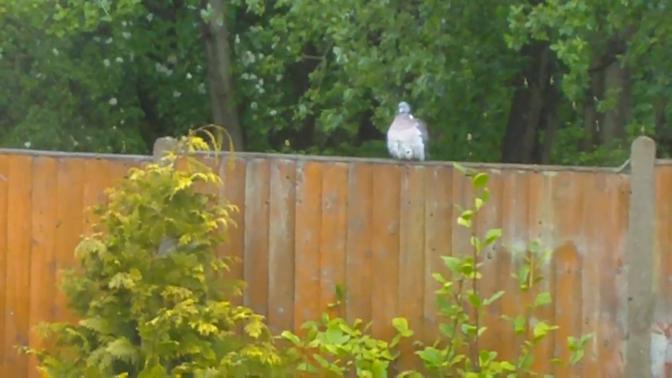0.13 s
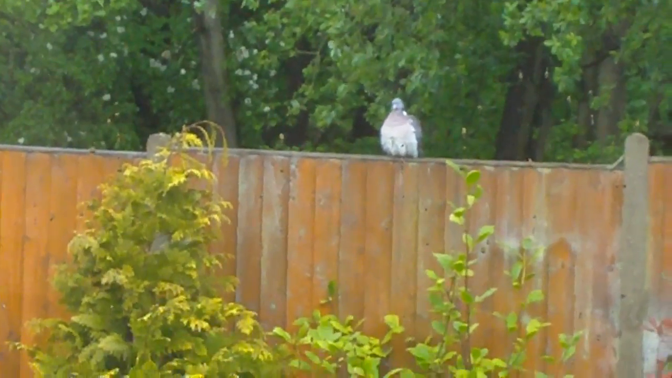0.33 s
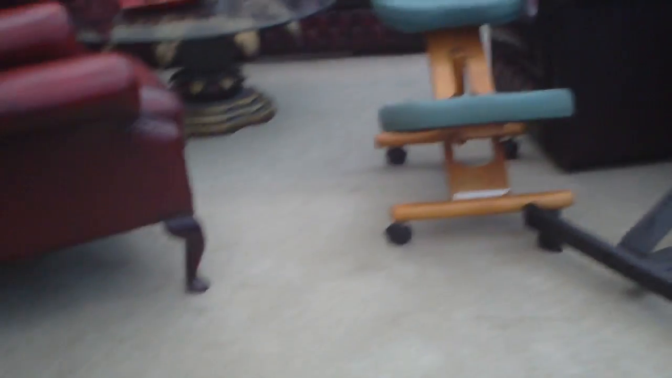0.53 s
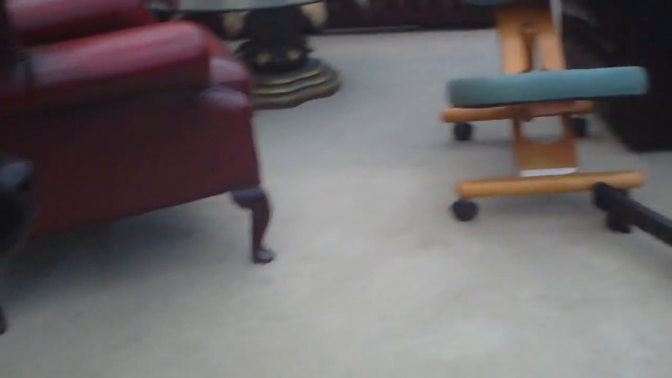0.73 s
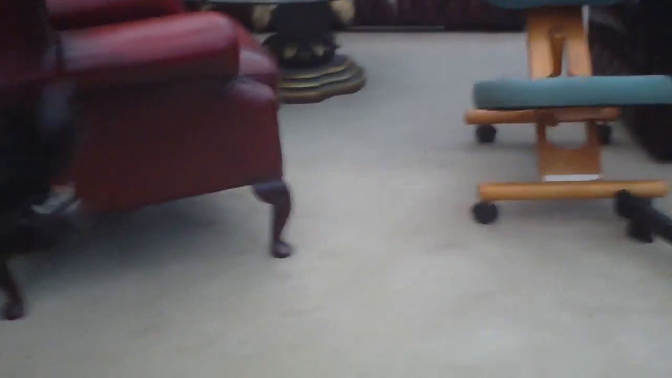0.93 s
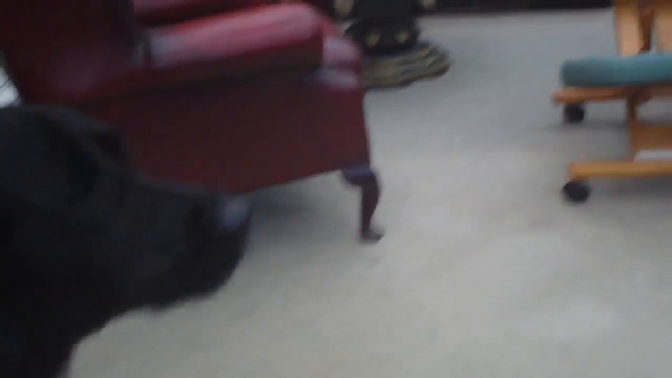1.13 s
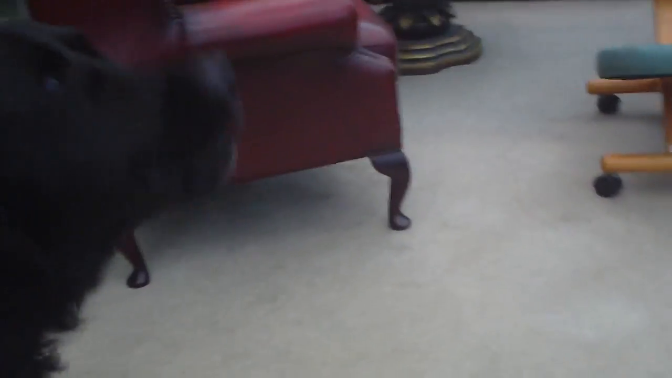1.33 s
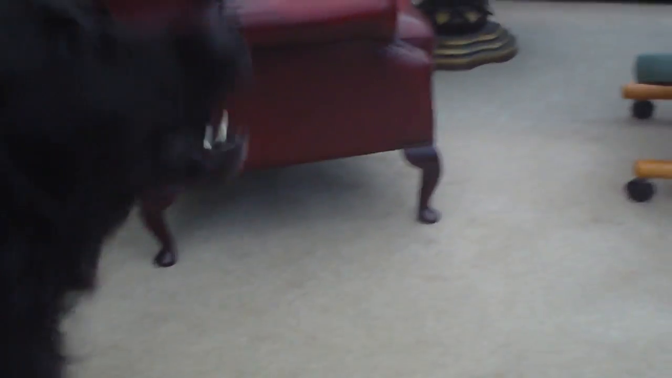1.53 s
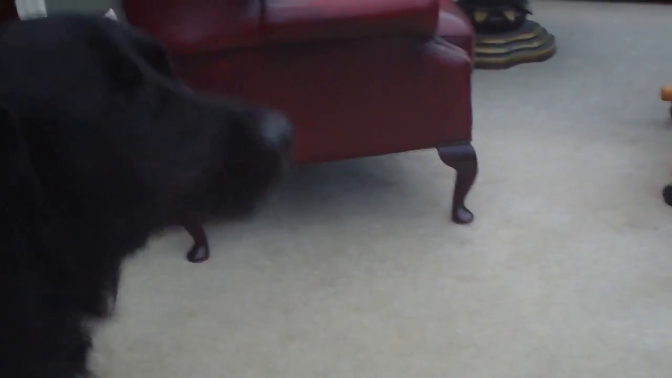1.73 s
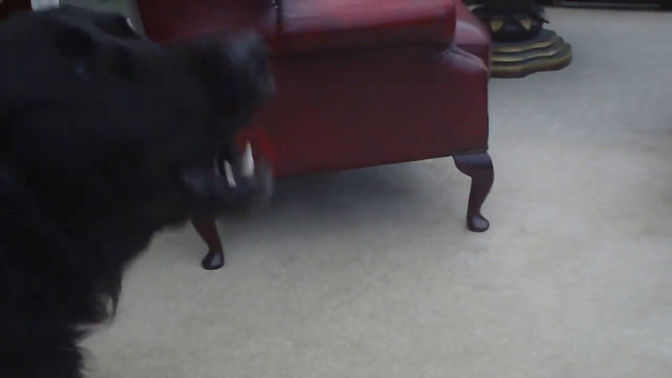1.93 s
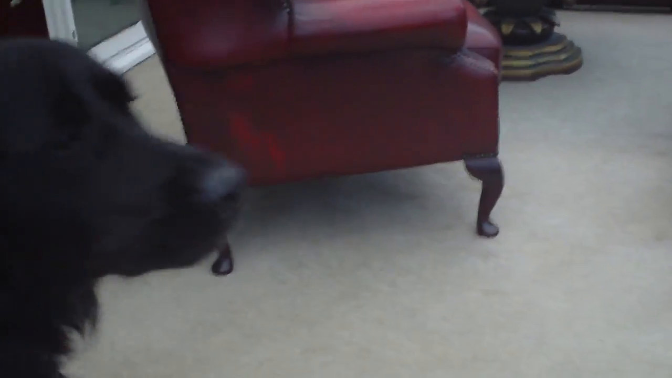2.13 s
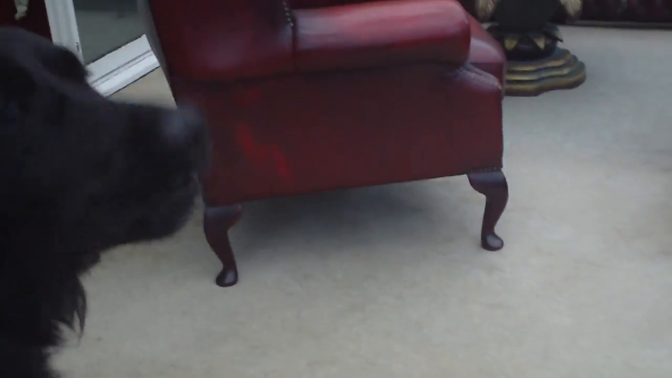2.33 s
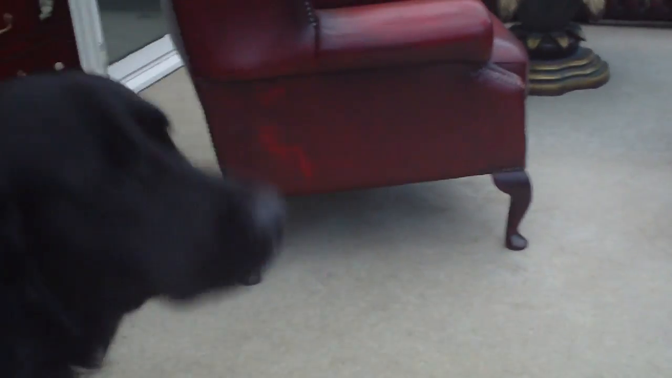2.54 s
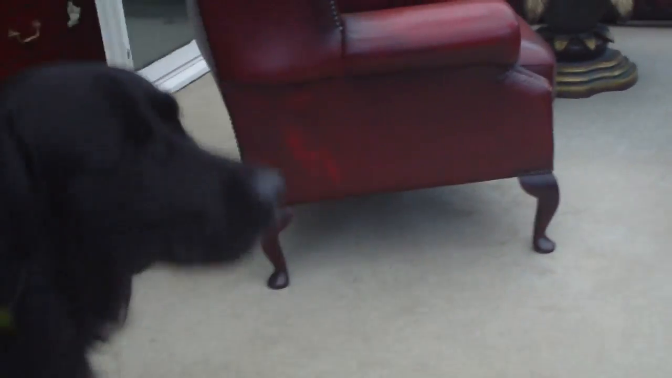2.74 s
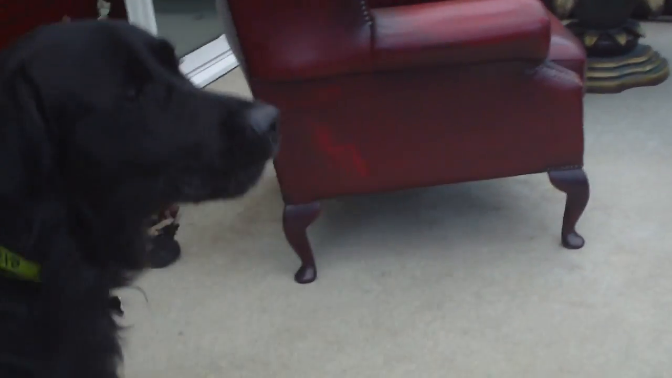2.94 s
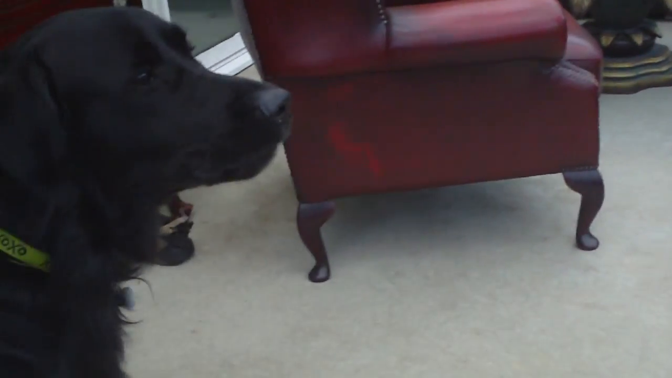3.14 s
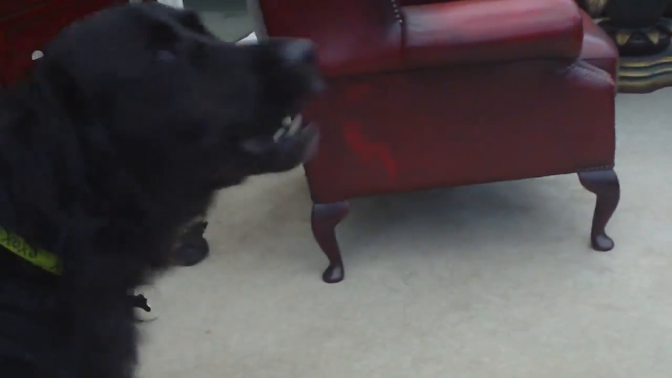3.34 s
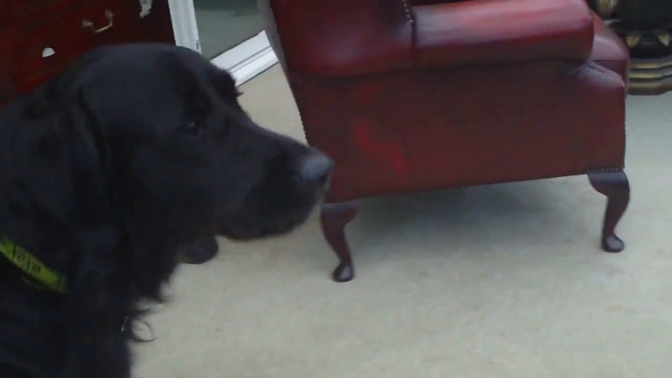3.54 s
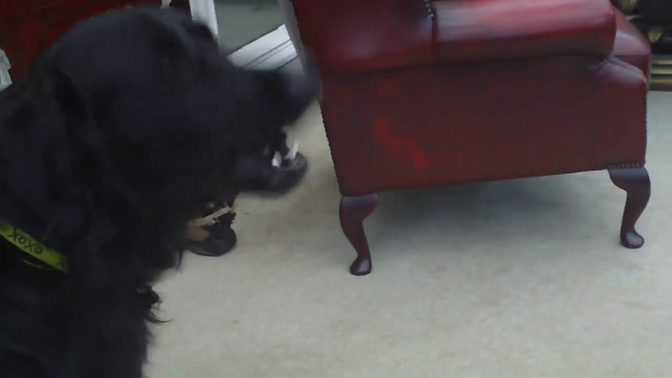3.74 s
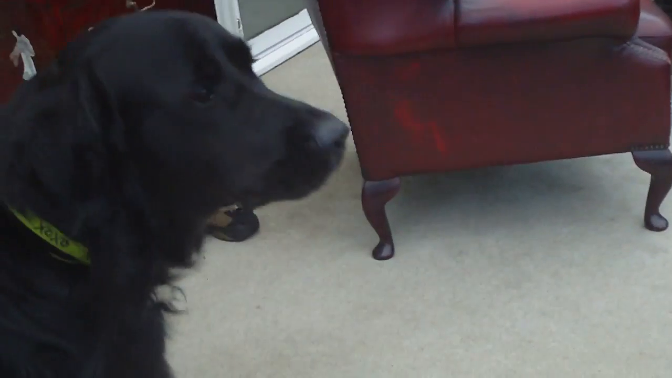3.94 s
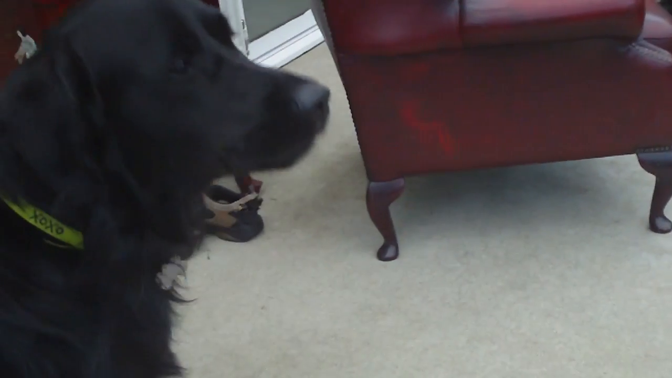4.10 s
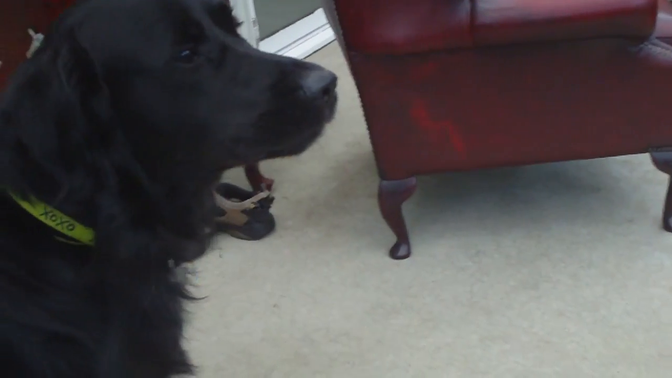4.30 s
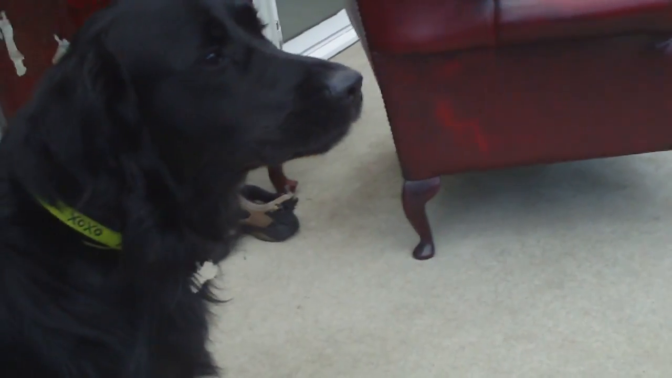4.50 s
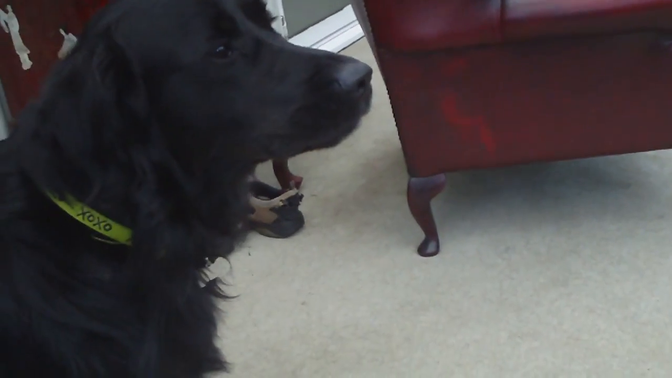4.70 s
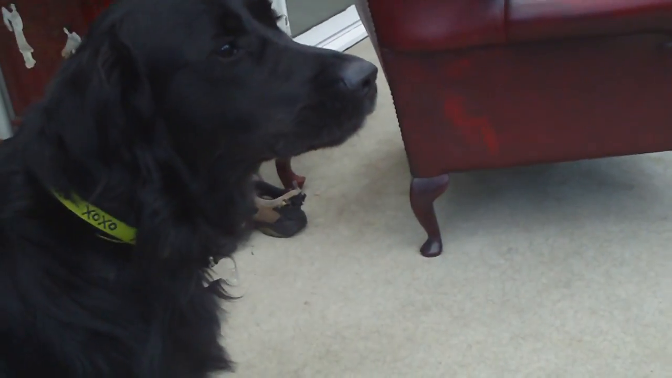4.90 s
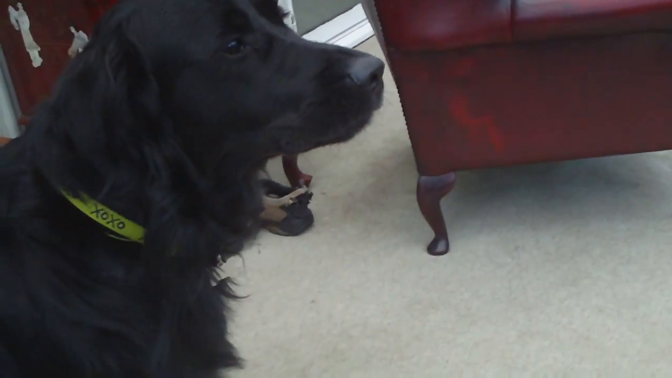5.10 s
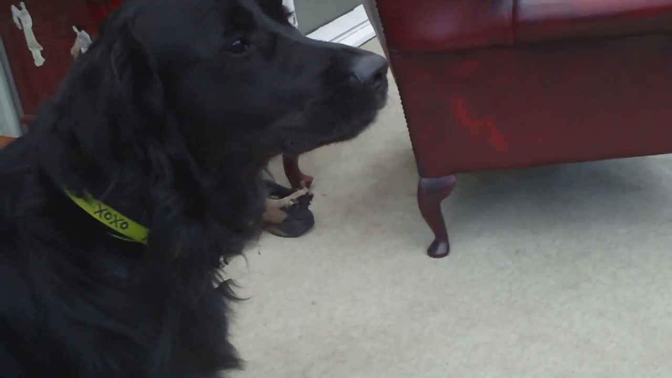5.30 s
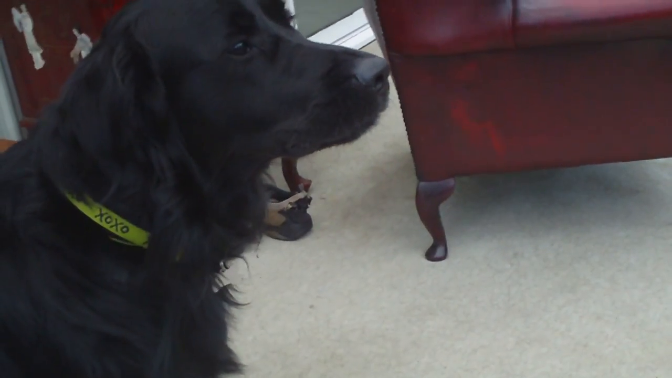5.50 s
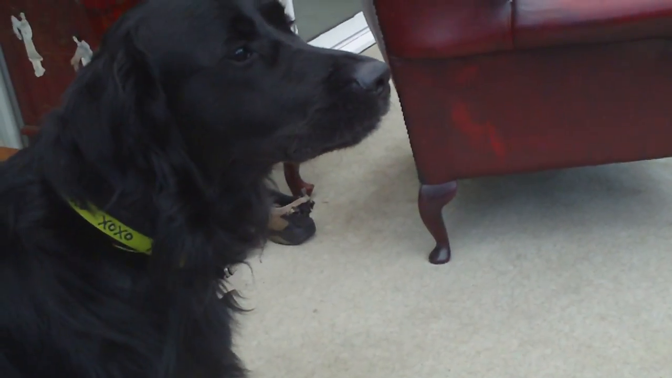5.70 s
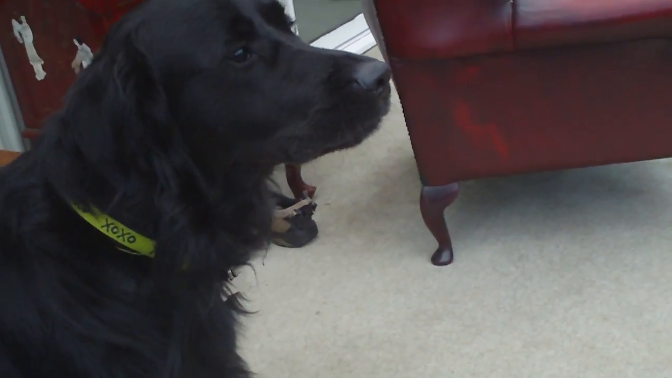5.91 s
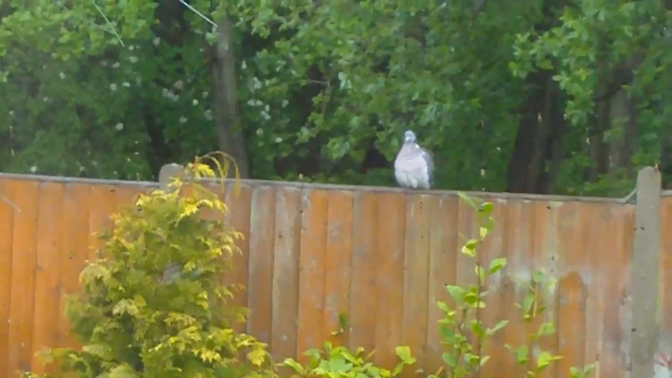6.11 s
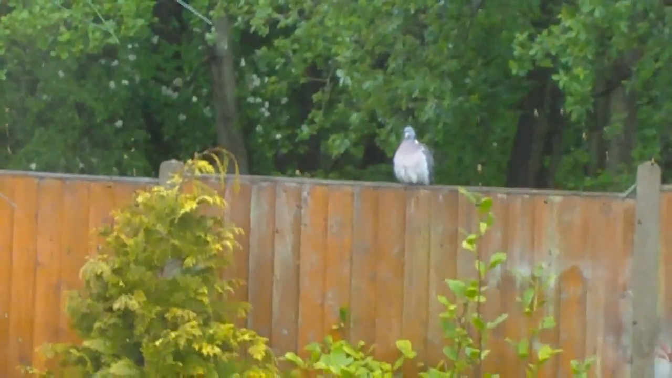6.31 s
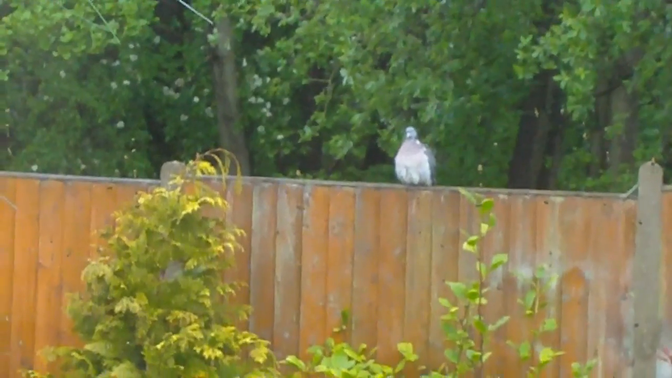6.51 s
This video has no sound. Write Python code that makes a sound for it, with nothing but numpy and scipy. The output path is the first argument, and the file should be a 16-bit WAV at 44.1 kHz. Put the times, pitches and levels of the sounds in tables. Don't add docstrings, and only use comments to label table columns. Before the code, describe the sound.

Steady camera hiss and a tiny sharp tick open the scene. A large dog, very close to a small camera in a carpeted room, growls briefly and gives five loud, sharp barks, each rising out of a growl and sinking back. A collar tag rings faintly. After a pause come two more barks, then swelling hiss, and finally a low creaky growl that is still going at the end.

```python
import sys
import numpy as np
from scipy import signal
from scipy.fft import rfft, irfft
from scipy.io import wavfile
from scipy.ndimage import uniform_filter1d

SR = 44100
rng = np.random.default_rng(int(sys.argv[2]) if len(sys.argv) > 2 else 0)


def gain_from_db(level_db):
    decades = np.asarray(level_db, float) / 20
    return 10 ** decades


def digitize_waveform(pressure):
    field = np.atleast_2d(pressure).T
    bounded = np.clip(field, -1, 1)
    quanta = np.round(bounded * 32767).astype(np.int16)
    wavfile.write(sys.argv[1], SR, quanta)


N = 288855

# frequency in Hz, level in dB per Hz.
HISS = [(15, -48), (25, -18.5), (91, -7.5), (239, 1), (288, -1.5), (596, -2), (2050, -7.5), (3150, 1),
        (4720, -13.5), (6010, -15.5), (6520, -13.5), (8300, -15), (9750, -21), (11500, -40), (15400, -18)]
# frequency in Hz, width in Hz, depth as a peak level in dB.
GAP = (11300, 700, 0)
# frequency in Hz, level over the hiss in dB, start in seconds.
WHINES = [(1087, -14, 0), (6595, -22, 0), (15278, -21, 0), (14987, -17, 6.15), (7690, -20, 6.15),
          (2164, -20, 6.15)]
# time in seconds, level in dB.
REST = [(0, -58), (.3, -53), (.44, -51.5), (.45, -53.5), (.98, -49), (5.5, -54.5), (6.12, -55), (6.16, -54),
        (6.55, -52.5)]
DUCKED_DB, HOLD_S, RECOVER_DB_PER_S = -69, 0.39, 9.5
# start in seconds, length in seconds, depth in dB.
CUTS = [
    (0.445, 0.0034, -9.5),
    (6.118, 0.029, -9),
]
# start in seconds, peak in dB, frequency in Hz, t60 in seconds.
TICKS = [
    (.1545, -24, 3950, 0.00082),
    (0.2065, -38.5, 2460, .004),
]

# time in seconds, pitch in Hz, level in dB.
GROWLS = [
    [(.675, 72.85, -50), (.757, 78.85, -38), (.81, 77.63, -35.5), (.871, 96.97, -35), (.96, 108.2, -28),
     (1.27, 132, -56), (1.9, 118, -43), (2.3, 97, -50.5), (2.8, 135.4, -63)],
    [(3.262, 101.9, -61.5), (3.31, 101.1, -42), (3.66, 101.3, -57.5), (3.76, 101.5, -47),
     (4.07, 103.6, -51), (4.42, 96, -50.5), (4.6, 83.35, -50), (4.71, 72.77, -50.5), (5.01, 64.56, -51.5)],
    [(6.118, 57.16, -38.5), (6.33, 55.24, -38.5), (6.55, 51.96, -37)],
]
CLEAR_ROUGH, CREAK_ROUGH, CREAK_HZ = .11, [.28, .25, .24], (75, 97)
# start in seconds, length in seconds, effort in dB, top pitch in Hz,
# throat level over effort in dB.
BARKS = [
    (.972, 0.13, -11.5, 421.2, -0.5),
    (1.279, 0.13, -16, 426.7, 4),
    (1.572, .126, -14, 381, 4),
    (1.942, 0.14, -16, 386.3, 6),
    (2.414, 0.13, -13.5, 386.7, 3),
    (3.318, .13, -11.5, 438, -1),
    (3.773, 0.14, -15, 401.7, 1),
]
BARK_ROUGH = [.15, .2, .2, .24, .2, .3, .22]
# attack in seconds, pitch climb in seconds, mouth and rasp over effort in dB.
JAWS = [(.033, .08, 2.5), (.052, .085, -2), (.056, .085, .5), (.055, 0.075, 1.5), (0.056, 0.088, 1.5),
        (.054, .095, -.5), (.054, .078, -1)]
# level in dB, rise from in dB, sag while held in dB,
# slump at release in dB, fade in dB per second.
LAYERS = [(-0.5, -36, -13.5, -22.5, -200), (0, -28.5, -4.5, -3, -160), (-3.5, -25, -13, 1, -150),
          (-10, -24, -11, -5, -150)]
SLUMP_S, LINGER_S = 0.0083, .022
CLIMB_BEND, DROP_S, DROP_BEND = 1.3, .045, 1.4
DROOP = .06

# frequency in Hz, level in dB.
CHEST = [(40, -45), (57, -28), (72, -12), (100, -6), (170, 0), (220, -3), (300, -13), (400, -23),
         (560, -36), (900, -55)]
# frequency in Hz, width in Hz, level in dB.
NOSE = [
    [(505, 50, -16)],
    [(660, 80, -20)],
    [(360, 100, -9), (520, 45, -7)],
]
# frequency in Hz, width in Hz, level in dB.
THROAT = [(440, 170, -7), (580, 160, -13), (780, 115, 0)]
# frequency in Hz, width in Hz, level in dB.
MOUTH = [(970, 130, -4), (1225, 135, 0), (1470, 150, -21)]
# frequency in Hz, width in Hz, level in dB.
RASP = [(2070, 130, 0), (2260, 170, -11), (3200, 300, -40), (3690, 140, -18), (4480, 170, -22),
        (5150, 300, -23), (6200, 420, -22), (7500, 1000, -29), (9000, 1600, -32)]
OPENS_HZ = (133, 292)
GROWL_AIR, RASP_NOISE = 1.0, .36
SHIMMER_DB, CLUMP_DB = 6., 7.5
DIE_S = .07

# frequency in Hz, t60 in seconds.
ROOM = [(100, 0.23), (400, 0.42), (800, 0.37), (2000, 0.37), (5000, 0.34), (10000, 0.25)]
ROOM_DB, EARLY_DB = -9.5, -5
# time in seconds, level in dB.
TAG_HITS = [
    (1.557, -61.5),
    (1.84, -50),
]
# frequency in Hz, level in dB, t60 in seconds.
TAG = [(7800, 0, .45), (7000, -6, .1)]
# start in seconds, thud in dB, thud frequency in Hz, thud t60 in seconds,
# rustle in dB, rustle t60 in seconds.
PAW = (2.916, -55, 347, 0.3, -60.5, 0.9)

CEILING = 1.15
EDGE_HZ, BASS_HZ = 10700, 78
TOP_FROM_HZ, TOP_SHIFT_HZ = (5300, 9000), 6350
TOP_DB, TOP_GATE_DB = -14, -63


def read(points, hz):
    f, value = np.transpose(points)
    return np.interp(np.log(hz + 1), np.log(f + 1), value)


def peaks(modes, hz):
    return sum(gain_from_db(db) / (1 + (2 * (hz - f) / w) ** 2) ** 1.4 for f, w, db in modes)


def above(hz, edge):
    return 1 / np.sqrt(1 + (edge / (hz + 1)) ** 8)


def evened(x):
    return x / np.sqrt(np.mean(x ** 2) + 1e-20)


def coloured(x, gain):
    return irfft(rfft(x) * gain(np.fft.rfftfreq(len(x), 1 / SR)), len(x))


def add(mix, s, sound):
    part = mix[round(s * SR):][:len(sound)]
    part += sound[:len(part)]


def ping(t, db, hz, t60):
    return gain_from_db(db - 60 * t / t60) * np.sin(2 * np.pi * hz * t)


def gain_control(t):
    level_db = np.interp(t, *np.transpose(REST))
    for (start, *_), (attack, *_) in zip(BARKS, JAWS):
        since = t - start - attack
        ducked_db = DUCKED_DB + RECOVER_DB_PER_S * np.maximum(since - HOLD_S, 0)
        level_db = np.where(since > 0, np.minimum(level_db, ducked_db), level_db)
    for s, length, db in CUTS:
        level_db = level_db + db * (t > s) * (t < s + length)
    return gain_from_db(level_db)


def hiss():
    t = np.arange(N) / SR
    colour = lambda f: gain_from_db(read(HISS, f)) * (1 - peaks([GAP], f))
    out = evened(coloured(rng.standard_normal(N), colour))
    for hz, db, start in WHINES:
        waver = evened(uniform_filter1d(rng.standard_normal(N), size=1500))
        whine = np.sin(2 * np.pi * hz * t + 0.51 * waver)
        out += gain_from_db(db + 2.8 * waver) * whine * (t >= start)
    return out * gain_control(t)


def camera_ticks():
    out, t = np.zeros(N), np.arange(SR // 2) / SR
    for s, db, hz, t60 in TICKS:
        add(out, s, ping(t, db, hz, t60))
    return out


def effort(growl, creak):
    s, low_hz, low_db = np.transpose(growl)
    t = np.arange(s[0], s[-1], 1 / SR)
    hz = low = np.interp(t, s, low_hz)
    rough = np.interp(low, CREAK_HZ, (creak, CLEAR_ROUGH))
    gains = np.full((len(LAYERS), len(t)), gain_from_db(-120))
    gains[0] = gain_from_db(np.interp(t, s, low_db))
    for bark, jaw, uneven in zip(BARKS, JAWS, BARK_ROUGH):
        start, length, effort_db, top_hz, throat_db = bark
        attack, climb, mouth_db = jaw
        since, after = t - start, np.maximum(t - start - length, 0)

        rise = np.sin(np.pi / 2 * np.clip(since / climb, 0, 1)) ** CLIMB_BEND
        lift = rise * np.exp(-(after / DROP_S) ** DROP_BEND)
        lift = lift * (1 - DROOP * np.clip((since - climb) / (length - climb), 0, 1) ** 2)
        hz, rough = hz + lift * (top_hz - low), rough + lift * (uneven - rough)

        coming = np.clip(1 - since / attack, 0, 5)
        held = np.clip((since - attack) / (length + LINGER_S - attack), 0, 1)
        gone = np.maximum(after - LINGER_S, 0)
        slump = 1 - np.exp(-gone / SLUMP_S)
        over_db = (0, throat_db, mouth_db, mouth_db)
        for k, (db, rise_db, sag_db, slump_db, fade_db) in enumerate(LAYERS):
            shape_db = rise_db * coming + sag_db * held + slump_db * slump + fade_db * gone
            gains[k] += gain_from_db(effort_db + db + shape_db + over_db[k])
    return t, hz, rough, gains


def overtones(turns, hz, gain, count, floor=0):
    k = np.arange(1, count + 1)[:, None]
    heights = gain(k * hz[::16]).repeat(16, axis=1)[:, :len(hz)]
    waves = np.cos(2 * np.pi * k * (turns - .07 * k))
    return np.sqrt(2) * (heights * waves).sum(0) / np.sqrt((heights ** 2).sum(0) + floor)


def turbulence(puffs, modes):
    hoarse = np.zeros(len(puffs))
    for mode in modes:
        clumps = evened(uniform_filter1d(rng.standard_normal(len(puffs)), size=700))
        hoarse += gain_from_db(CLUMP_DB * clumps) * coloured(puffs, lambda f: peaks([mode], f))
    return evened(hoarse)


def voice(growl, creak, nose):
    t, hz, rough, gains = effort(growl, creak)
    cycles, chance = np.cumsum(hz) / SR, rng.standard_normal((3001, 2))
    wobble, swing = (np.interp(cycles / 1.2, np.arange(3000), np.diff(c)) for c in chance.T)
    turns = np.cumsum(hz * (1 + .2 * rough * wobble)) / SR
    puffs = (.25 + np.exp(-(turns % 1) / .25)) * rng.standard_normal(len(t))
    jaw = np.clip((hz - OPENS_HZ[0]) / (OPENS_HZ[1] - OPENS_HZ[0]), 0, 1) ** 2

    chest = lambda f: gain_from_db(read(CHEST, f)) + peaks(nose, f)
    air = GROWL_AIR * rough * (1 - np.sqrt(jaw)) ** 2
    hum = np.sqrt(1 - air) * overtones(turns, hz, chest, count=14)
    breath = np.sqrt(air) * evened(coloured(puffs, chest))
    out = gains[0] * (hum + breath)

    breathy = np.clip(.8 * rough, 0, 1)
    noises = (breathy, breathy, RASP_NOISE)
    for gain, modes, noise in zip(gains[1:], (THROAT, MOUTH, RASP), noises):
        tone = overtones(turns, hz, lambda f: peaks(modes, f), count=22, floor=1.0)
        hoarse = turbulence(puffs, modes)
        open_mouth = jaw * gain * (np.sqrt(1 - noise) * tone + np.sqrt(noise) * hoarse)
        out += coloured(open_mouth, lambda f: above(f, 300))

    runs_on = t[-1] > N / SR - .01
    fade = np.clip(np.minimum((t - t[0]) / .004, (t[-1] - t) / DIE_S + runs_on), 0, 1)
    return t[0], out * gain_from_db(SHIMMER_DB * rough * swing) * fade


def room(x):
    taps = np.zeros(SR)
    at = np.arange(500, SR - 20, 20)
    taps[at + rng.integers(0, 20, len(at))] = rng.choice([-1., 1.], len(at))
    hz, t, z = signal.stft(taps, SR, nperseg=256)
    decay = gain_from_db(-60 * t / read(ROOM, hz)[:, None])
    tail = signal.istft(z * decay, SR, nperseg=256)[1][:SR]
    tail *= gain_from_db(ROOM_DB) / np.linalg.norm(tail)
    tail[rng.integers(60, 1500, size=12)] += gain_from_db(EARLY_DB) * rng.choice([-.29, .29], size=12)
    sent = coloured(x, lambda f: above(f, 330))
    return x + signal.fftconvolve(sent, tail)[:N]


def collar_tag():
    out, t = np.zeros(N), np.arange(SR // 2) / SR
    for s, db in TAG_HITS:
        add(out, s, sum(ping(t, db + mode_db, hz, t60) for hz, mode_db, t60 in TAG))
    return out


def paw_shift():
    out, t = np.zeros(N), np.arange(SR // 2) / SR
    s, db, hz, t60, rustle_db, rustle_t60 = PAW
    add(out, s, ping(t, db, hz, t60))
    rustle = evened(coloured(rng.standard_normal(len(t)), lambda f: peaks([(243.2, 1200, 0)], f)))
    add(out, s, gain_from_db(rustle_db - 60 * t / rustle_t60) * rustle)
    return out


def scene():
    dog = np.zeros(N)
    for growl, creak, nose in zip(GROWLS, CREAK_ROUGH, NOSE):
        add(dog, *voice(growl, creak, nose))
    return (room(dog) + camera_ticks() + collar_tag() + paw_shift())[None]


def top_cut(x):
    return signal.sosfilt(signal.butter(12, 15720, fs=SR, output="sos"), x)


def record(dry):
    z, hz = rfft(CEILING * np.tanh(dry[0] / CEILING)), np.fft.rfftfreq(N, 1 / SR)
    band = z * (hz > TOP_FROM_HZ[0]) * (hz < TOP_FROM_HZ[1])
    top = gain_from_db(TOP_DB) * irfft(np.roll(band, round(TOP_SHIFT_HZ * N / SR)), N)
    power = abs(uniform_filter1d(top ** 2, size=600))
    top *= power / (power + gain_from_db(2 * TOP_GATE_DB))
    kept = z / np.sqrt(1 + (hz / EDGE_HZ) ** 80) * above(hz, BASS_HZ)
    mix = irfft(kept, N) + top + hiss()
    return top_cut(mix[None])


dry = scene()
out = record(dry)
digitize_waveform(out)
```